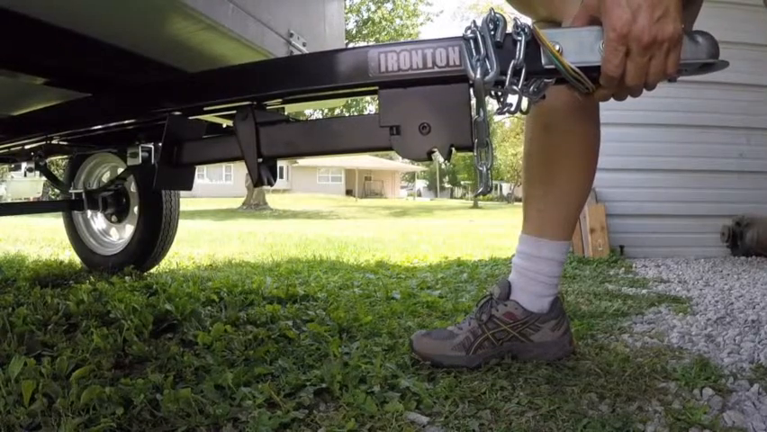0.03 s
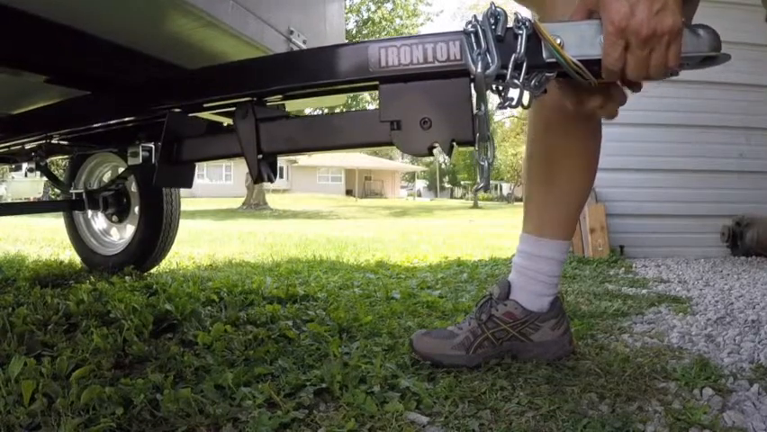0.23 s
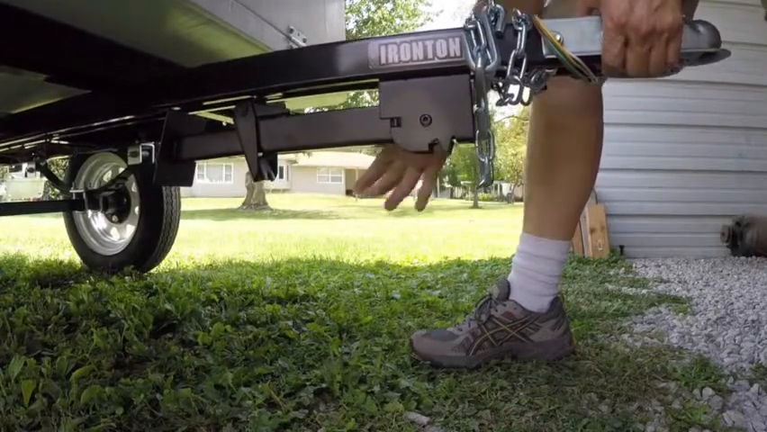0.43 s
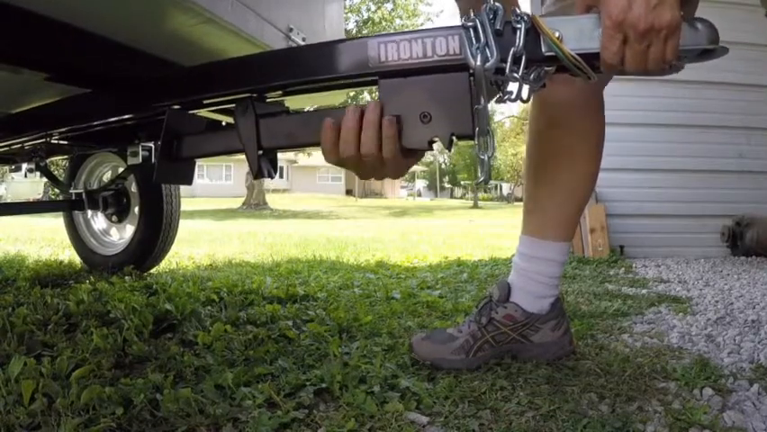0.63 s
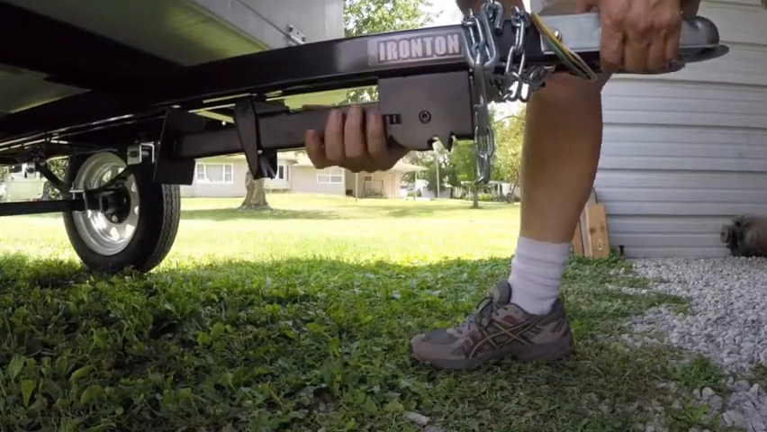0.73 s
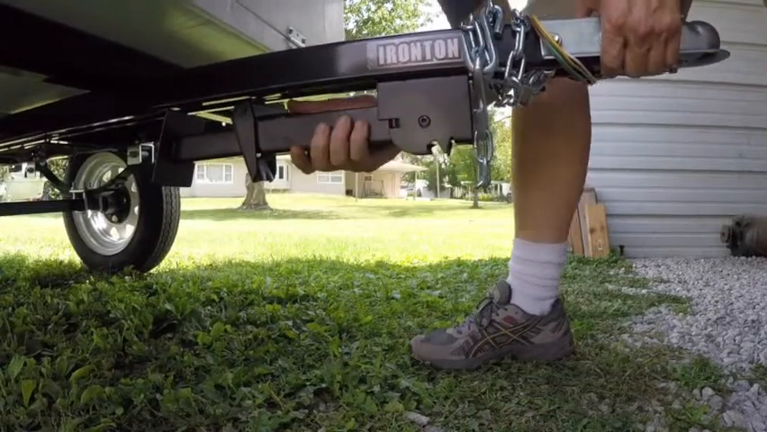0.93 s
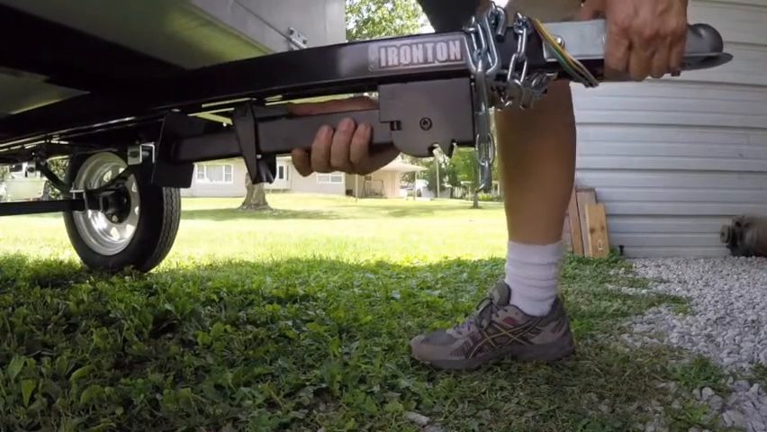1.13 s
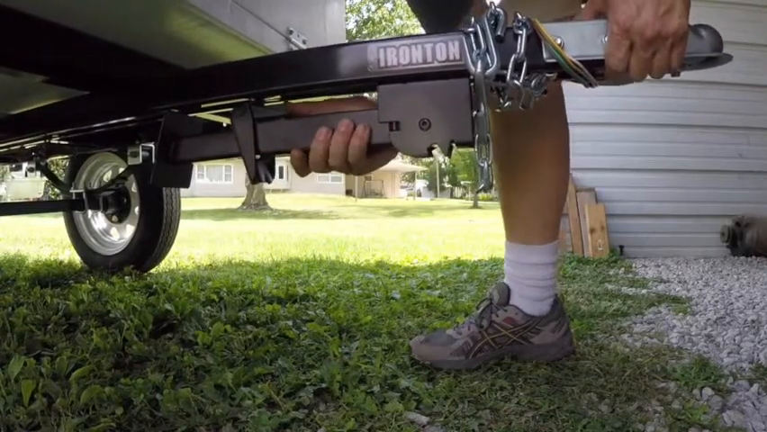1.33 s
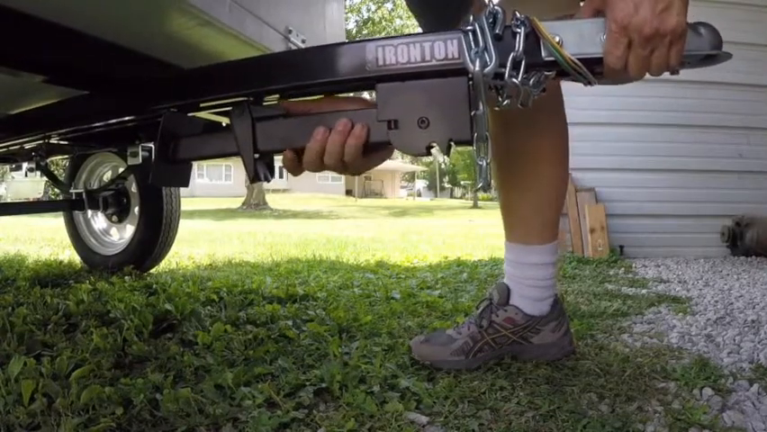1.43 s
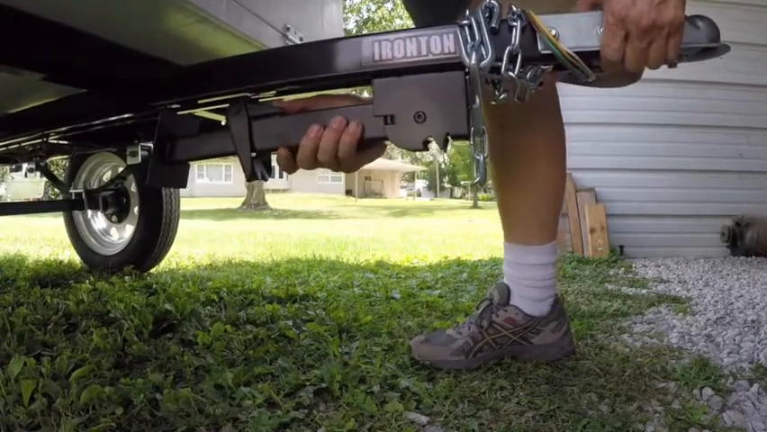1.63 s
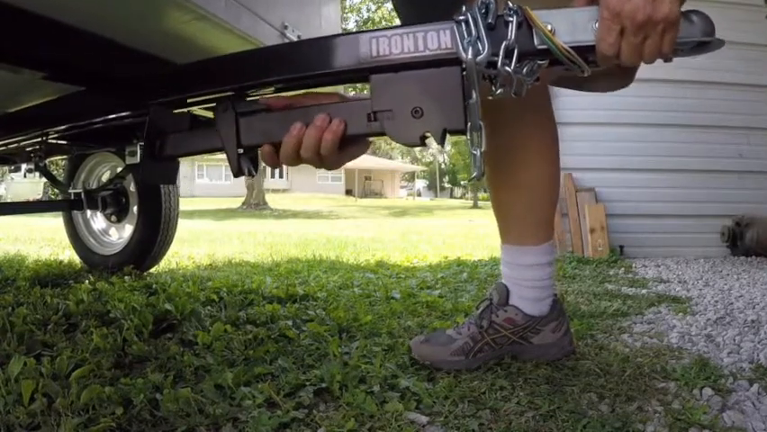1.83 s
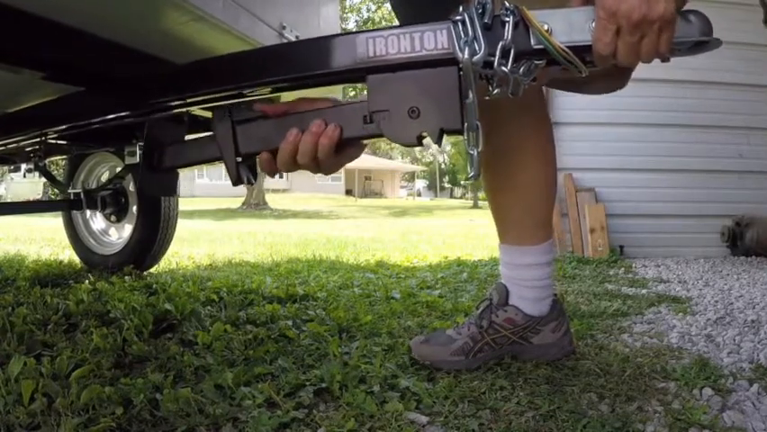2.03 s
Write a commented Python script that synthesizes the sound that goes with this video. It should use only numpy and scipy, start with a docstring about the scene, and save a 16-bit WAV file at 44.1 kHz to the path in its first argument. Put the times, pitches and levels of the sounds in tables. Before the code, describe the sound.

One loud metal clank of a trailer jack pulled loose, several blows in quick succession with a low boom and short ring, after soft hand brushes and light taps; quiet grassy yard, crickets, close microphone.

```python
"""A cricket chirps over low rumble and distant hiss, then a hand brushes and nudges a steel trailer jack close by.
The jack breaks free in a quick run of blows: filtered noise makes the contact cracks and the brief echo,
decaying sines make the clank of tube and plates, the dense ring and the boom of the trailer frame.
Brushes, knocks, hum, hiss and rumble are shaped noise; insects are narrow bands pulsed by wing strokes."""
import sys
import numpy as np
from scipy import signal
from scipy.fft import rfft, irfft
from scipy.io import wavfile

SR = 44100
rng = np.random.default_rng(int(sys.argv[2]) if len(sys.argv) > 2 else 0)


def pcm_store(signal):
    """Save signal as 16-bit PCM."""
    levels = np.round(np.clip(np.atleast_2d(signal), -1, 1) * 32767)
    wavfile.write(sys.argv[1], SR, levels.astype(np.int16).T)


N = 91772  # length [samples]
TOP_HZ = 15600  # upper edge of the whole sound


def undb(db):
    """Decibels to gain."""
    return 10 ** (np.asarray(db) / 20)


def unit(x):
    """Scale to rms 1."""
    return x / np.sqrt(np.mean(x ** 2))


def clock():
    """Time of every sample in seconds."""
    return np.arange(N) / SR


def colour(hz, points):
    """Gain of a spectrum drawn through (frequency, dB) points, falling 12 dB per octave outside its ends."""
    f, db = np.array(points, float).T
    hz = np.maximum(hz, 1)
    inside = undb(np.interp(np.log(hz), np.log(f), db))
    skirts = np.minimum(1, np.minimum(hz / f[0], f[-1] / hz)) ** 2
    return inside * skirts


def noise(points, tilt_db=0, peaks=()):
    """Noise of a given spectrum, tilted in dB per octave, with resonances (Hz, width, dB) on top; rms 1."""
    hz = np.arange(N // 2 + 1) * SR / N + 1  # 1 Hz up, to keep the logarithm finite
    db = tilt_db * np.log2(hz)
    for centre, width, lift in peaks:
        db = db + lift / (1 + (2 * (hz - centre) / width) ** 2)
    white = rfft(rng.standard_normal(N))
    return unit(irfft(white * colour(hz, points) * undb(db), N))


def drift(rate_hz):
    """Smooth random wandering from noise under a Gaussian low-pass, rms 1."""
    hz = np.arange(N // 2 + 1) * SR / N
    white = rfft(rng.standard_normal(N))
    return unit(irfft(white * np.exp(-.5 * (hz / rate_hz) ** 2), N))


def strike(age, rise, t60):
    """Envelope of a blow: quick rise, then exponential decay by 60 dB in t60."""
    age = np.maximum(age, 0)
    return (1 - np.exp(-age / rise)) * np.exp(-np.log(1000) * age / t60)


def ring(modes, blows, rise, phases):
    """Decaying sines (Hz, dB, t60), each topped up in energy by every blow (s, dB, brightness)."""
    first = min(blow[0] for blow in blows)
    start = int(first * SR)
    t, out = clock()[start:], np.zeros(N)
    for (hz, db, t60), phase in zip(modes, phases):
        octaves = np.log2(hz / 1000)  # brightness pivots at 1 kHz
        energy = 0
        for s, force, bright in blows:
            energy = energy + (undb(force + bright * octaves) * strike(t - s, rise, t60)) ** 2
        out[start:] += undb(db) * np.sqrt(energy) * np.sin(2 * np.pi * hz * (t - first) + phase)
    return out


RATTLE_DEPTH, RATTLE_HZ = 0.41, 24.3  # random waver of each mode: rms depth, rate


def rattling(modes, blows, rise):
    """Modes of a loose part: each one wavers in strength on its own."""
    out = np.zeros(N)
    for mode in modes:
        tone = ring([mode], blows, rise, [rng.uniform(0, 2 * np.pi)])
        out += tone * (1 + RATTLE_DEPTH * drift(RATTLE_HZ))
    return out


# blows of the jack against its bracket: (time [s], clank level [dB], brightness [dB per octave],
# push on the frame [dB], push on the bracket plates [dB])
JACK_BLOWS = [(1.8333, 0.5, -1, -4.5, -14.5), (1.8742, -4.5, 0.6, -0.5, -13.5), (1.8883, 0, 0.9, -4, -2.5),
              (1.8995, -14.5, -15, 2, 1.5), (1.911, -19.5, -10, -18.5, -23)]


def jack():
    """Each blow cracks, rings tube, plates and a crowd of weak modes, booms the frame and echoes briefly."""
    clanks = [row[:3] for row in JACK_BLOWS]
    frame_pushes = [(s, push, 0) for s, _, _, push, _ in JACK_BLOWS]
    plate_pushes = [(s, push, 0) for s, _, _, _, push in JACK_BLOWS]
    loose_steel = contact_crack(clanks) + tube(clanks) + plates(plate_pushes)
    return loose_steel + frame(frame_pushes) + crowd(clanks) + tail(clanks)


# spectrum of the contact crack: (frequency [Hz], level [dB per Hz])
CRACK_SPECTRUM = [(150, -19), (400, -21.5), (700, -9.5), (1000, -1.5), (1300, -0.5), (1750, -7.5),
                  (2700, -15), (3500, -13.5), (4700, -19), (6900, -18), (7700, -28), (11000, -38.5),
                  (15000, -44)]
# short, broad resonances of the contact: (frequency [Hz], width [Hz], lift over the crack [dB])
CONTACT_PEAKS = [(1223, 150, 9), (3000, 260, 11.5), (4225, 185, 11.5), (5370, 120, 1.5), (5770, 150, 7.5),
                 (6750, 220, -2), (8120, 190, 11.5)]
CRACK_DB, CRACK_RISE_S, CRACK_T60_S = -9, 0.00096, .04


def contact_crack(blows):
    """Steel meeting steel: a short burst of resonant noise at each blow."""
    t, out = clock(), np.zeros(N)
    for s, db, bright in blows:
        burst = noise(CRACK_SPECTRUM, bright, CONTACT_PEAKS)
        out += undb(CRACK_DB + db) * burst * strike(t - s, CRACK_RISE_S, CRACK_T60_S)
    return out


# modes of the steel tube: (frequency [Hz], level [dB], t60 [s])
TUBE_MODES = [(941, -26, .11), (1046, -28, .16), (1121, -31, .13), (1192, -33, .48), (1212, -38, .55),
              (1264, -17, .13), (1320, -42, .5), (1424, -32, .13), (1588, -31, .16), (2185, -39, .09),
              (2616, -38, .25), (3106, -27, .09), (4245, -32, .08), (5230, -39, .08), (5730, -36, .1),
              (6520, -51, .35), (6780, -38, .07)]
TUBE_RISE_S = .0015


def tube(blows):
    """The clank: the loose steel tube rings in its own modes."""
    return rattling(TUBE_MODES, blows, TUBE_RISE_S)


# modes of the bracket plates: (frequency [Hz], level [dB], t60 [s])
PLATE_MODES = [(553, -32.5, 0.16), (634, -30.5, 0.26), (664, -27, 0.13), (693, -19.5, 0.14),
               (754, -31.5, 0.2)]
PLATE_RISE_S = 0.0023


def plates(pushes):
    """The bracket plates ring lower than the tube and waver as loose parts."""
    return rattling(PLATE_MODES, pushes, PLATE_RISE_S)


# modes of the trailer frame: (frequency [Hz], level [dB], t60 [s])
FRAME_MODES = [(59.2, -29.5, 0.72), (96.24, -25, 0.53), (120, -24, 0.13), (138.5, -9.5, 0.26),
               (172, -24.5, 0.26), (299.3, -42, 0.48)]
FRAME_RISE_S = 0.0068


def frame(pushes):
    """The boom: the frame answers slowly in a few low modes, without waver."""
    return ring(FRAME_MODES, pushes, FRAME_RISE_S, np.zeros(len(FRAME_MODES)))


# dense ring of bracket, chains and deck: (frequency [Hz], level [dB per Hz])
CROWD_SPECTRUM = [(500, -33), (700, 0), (1300, 4), (2000, 0), (2900, 3.5), (3800, -3.5), (6800, -12),
                  (8500, -14), (15000, -28)]
CROWD_DB, CROWD_COUNT = -24.5, 260
CROWD_T60_S, CROWD_SLOPE = 0.17, 0.36  # mean t60 at 1 kHz, falling with frequency by this power


def crowd(blows):
    """Many weak modes of random size and damping blend into a dense metallic ring."""
    place, size, damping, turn = rng.random((CROWD_COUNT, 4)).T
    ends = np.sqrt([CROWD_SPECTRUM[0][0], TOP_HZ])
    # spread evenly in the square root of frequency, with a random place in each slot
    hz = np.interp((np.arange(CROWD_COUNT) + place) / CROWD_COUNT, [0, 1], ends) ** 2
    spacing = np.sqrt(np.sqrt(hz))  # wider-spaced modes are louder, to hold the level per Hz
    gain = unit(colour(hz, CROWD_SPECTRUM) * spacing * (.5 + size) ** 2) * np.sqrt(2 / CROWD_COUNT)
    t60 = CROWD_T60_S * (.5 + damping) * (hz / 1000) ** -CROWD_SLOPE
    modes = zip(hz, CROWD_DB + 20 * np.log10(gain), t60)
    return ring(modes, blows, TUBE_RISE_S, 2 * np.pi * turn)


# diffuse echo from the trailer's underside and the wall: (frequency [Hz], level [dB per Hz])
TAIL_SPECTRUM = [(200, -1.5), (300, 5.5), (450, -3.5), (680, 9.5), (1000, -0.5), (1250, 2.5), (1600, 0.5),
                 (2100, -18.5), (2680, -7.5), (3700, -19.5), (5000, -21.5), (6500, -22), (9000, -34),
                 (15000, -42)]
TAIL_DB, TAIL_RISE_S, TAIL_T60_S = -29, 0.0057, 0.34


def tail(blows):
    """Diffuse echo: a softer burst of noise after each blow that dies away more slowly than the crack."""
    t, out = clock(), np.zeros(N)
    for s, db, _ in blows:
        out += undb(TAIL_DB + db) * noise(TAIL_SPECTRUM) * strike(t - s, TAIL_RISE_S, TAIL_T60_S)
    return out


def hand():
    """Small knocks, flickering brushes on the steel and the low hum of the handled frame."""
    taps, strokes, hum = knocks(), brushes(), handling_hum()
    flicker = undb(2.2 * drift(80))
    return taps + strokes * flicker + hum


# light knocks of the jack in its play: (time [s], level [dB], rise [s], t60 [s],
# brightness [dB per octave], main resonance [Hz])
LIGHT_KNOCKS = [(1.042, -51.5, .002, .05, 2, 2250), (1.1193, -45.5, 0.00034, 0.052, -4.5, 1600),
                (1.243, -47.5, 0.00094, 0.057, -2.5, 1170), (1.437, -49, 0.0034, 0.092, 1.5, 1800),
                (1.469, -45, 0.0025, 0.11, 2, 1350), (1.563, -40, 0.0078, 0.12, 5, 1110)]
# spectrum of a knock: (multiple of the main resonance [ratio], level [dB per Hz])
KNOCK_SPECTRUM = [(.2, -13), (.55, -6.5), (.8, -1.5), (1, 3), (1.25, -5), (1.7, -9), (3.5, -16.5), (6, -24),
                  (11, -40)]


def knocks():
    """The nudged jack taps in its play: noise bursts gathered around one resonance each."""
    t, out = clock(), np.zeros(N)
    for s, db, rise, t60, bright, hz in LIGHT_KNOCKS:
        points = [(hz * multiple, gain) for multiple, gain in KNOCK_SPECTRUM]
        out += undb(db) * noise(points, bright) * strike(t - s, rise, t60)
    return out


# hand brushing over steel: (middle time [s], half length [s], level [dB], brightness [dB per octave])
HAND_BRUSHES = [(0.194, 0.075, -63.5, -3), (.355, 0.019, -59.5, -1), (0.532, 0.063, -65, -1.5),
                (0.719, 0.019, -60, -1), (0.792, 0.054, -62, -1), (.9, 0.038, -59.5, 4)]
# spectrum of a brush: (frequency [Hz], level [dB per Hz])
BRUSH_SPECTRUM = [(500, 8), (2000, 0), (4000, 2.5), (8000, -5), (15000, -13)]


def brushes():
    """The hand rubs over steel: soft swells of noise."""
    t, out = clock(), np.zeros(N)
    for s, half, db, bright in HAND_BRUSHES:
        out += undb(db) * noise(BRUSH_SPECTRUM, bright) * np.exp(-.5 * ((t - s) / half) ** 2)
    return out


# level of the frame's hum while it is handled: (time [s], level [dB])
HUM_LEVEL = [(0, -62), (.7, -58), (.79, -42.5), (.97, -53), (1.15, -41.5), (1.245, -49), (1.285, -33),
             (1.33, -53), (1.43, -45), (1.54, -36), (1.63, -36.5), (1.69, -49.5), (2.08, -34)]
# spectrum of the hum: (frequency [Hz], level [dB per Hz])
HUM_SPECTRUM = [(50, -12), (68, -4), (82, -15.5), (96, 4), (112, -10), (135, -7), (160, -17), (183, -15.5),
                (220, -32.5), (300, -26.5), (400, -45)]


def handling_hum():
    """The handled frame hums: low noise that follows a drawn level."""
    return noise(HUM_SPECTRUM) * undb(np.interp(clock(), *np.array(HUM_LEVEL).T))


def yard():
    """Distant hiss, low rumble and insects."""
    air = hiss() + rumble()
    return air + cricket() + far_cricket() + ticker() + buzz()


def trill(pitch, width):
    """A tone blurred into a narrow band by random wandering, rms about 1."""
    phase = 2 * np.pi * np.cumsum(pitch) / SR
    return (drift(width / 2) * np.cos(phase) + drift(width / 2) * np.sin(phase)) / np.sqrt(2)


CHIRP_EDGE_S, ECHO_DB, ECHO_T60_S = 0.0067, -4.5, 0.19


def insect(chirps, hz, width, pulse_hz, fall_hz, depth):
    """Chirps pulsed by wing strokes, pitch falling by fall_hz in each stroke, with an echo from the yard."""
    t, level, pitch = clock(), np.zeros(N), np.full(N, float(hz))
    for s, length, db in chirps:
        gate = np.clip(np.minimum(t - s, s + length - t) / CHIRP_EDGE_S + .5, 0, 1)
        stroke = (t - s) * pulse_hz % 1  # position within the wing stroke
        level += undb(db) * gate * (1 + depth * np.sin(2 * np.pi * stroke))
        pitch += gate * fall_hz * (.5 - stroke)
    direct = level * trill(pitch, width)
    echo = unit(rng.standard_normal(N) * strike(t, 0.013, ECHO_T60_S)) / np.sqrt(N)  # unit energy
    return direct + undb(ECHO_DB) * signal.fftconvolve(direct, echo)[:N]


# chirps of a cricket: (time [s], length [s], level [dB])
CRICKET_CHIRPS = [(.085, .15, -56.5), (.748, .14, -54.5), (1.533, .15, -54.5)]


def cricket():
    """The nearer cricket: long chirps of sliding strokes."""
    return insect(CRICKET_CHIRPS, hz=4630, width=195, pulse_hz=22, fall_hz=460, depth=0.33)


# strokes of a farther, lower cricket: (time [s], length [s], level [dB])
FAR_CHIRPS = [(.58, 0.028, -64.5), (.988, 0.017, -64.5), (1.038, 0.03, -63), (1.11, 0.025, -62.5),
              (1.495, 0.024, -60.5), (1.76, 0.08, -66), (2.008, .014, -65)]


def far_cricket():
    """A farther cricket: fainter, lower and mostly short strokes."""
    return insect(FAR_CHIRPS, hz=4250, width=220, pulse_hz=25.5, fall_hz=295, depth=0.23)


# chirps of a small, higher insect: (time [s], length [s], level [dB])
TICKER_CHIRPS = [(.138, 0.035, -63), (.318, 0.025, -59.5), (.712, 0.047, -61.5), (.89, 0.049, -63),
                 (1.082, 0.051, -63.5), (1.276, 0.0446, -64), (1.476, 0.047, -62.5), (1.668, 0.042, -63.5)]


def ticker():
    """A small insect ticks in short, high chirps."""
    return insect(TICKER_CHIRPS, hz=8340, width=340, pulse_hz=46.2, fall_hz=108, depth=0.15)


# buzz of a distant insect: (time [s], length [s], level [dB])
DISTANT_BUZZ = [(.25, .3, -69)]


def buzz():
    """A distant insect buzzes: a wider band in fast, deep pulses at one pitch."""
    return insect(DISTANT_BUZZ, hz=4760, width=500, pulse_hz=55.5, fall_hz=0, depth=.9)


# spectrum of the distant hiss: (frequency [Hz], level [dB per Hz])
HISS_SPECTRUM = [(150, -45), (250, -0.5), (308, -3), (366, -8.5), (563, 0.5), (646, -3), (729, 1.5),
                 (1120, -12.5), (2320, -20), (3220, -20), (4550, -14.5), (5310, -22.5), (7250, -26.5),
                 (8470, -19.5), (10400, -31), (14200, -28.5), (15500, -30)]
HISS_DB, HISS_SWELL_DB = -58, 2.02  # middle level, rms swell


def hiss():
    """Distant hiss: broad noise that swells slightly at random."""
    return undb(HISS_DB + HISS_SWELL_DB * drift(4.9)) * noise(HISS_SPECTRUM)


# spectrum of the low rumble: (frequency [Hz], level [dB per Hz])
RUMBLE_SPECTRUM = [(15, -10.5), (35, -0.5), (70, -3), (100, -6.5), (150, -15.5), (190, -11.5), (235, -25.5),
                   (400, -43.5)]
RUMBLE_DB = -45


def rumble():
    """Low rumble: deep noise at a steady level."""
    return undb(RUMBLE_DB) * noise(RUMBLE_SPECTRUM)


def scene():
    """Jack, hand and yard at one microphone."""
    return (jack() + hand() + yard())[None]


def record(dry):
    """The recorder cuts the top: a steep elliptic low-pass at TOP_HZ."""
    low_pass = signal.ellip(10, .2, 80, TOP_HZ, fs=SR, output="sos")
    return signal.sosfilt(low_pass, dry)


dry = scene()
out = record(dry)
pcm_store(out)
```